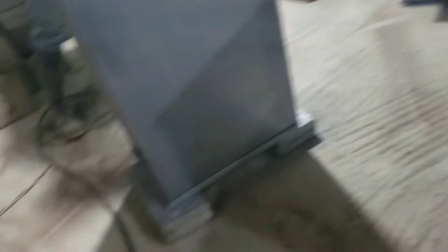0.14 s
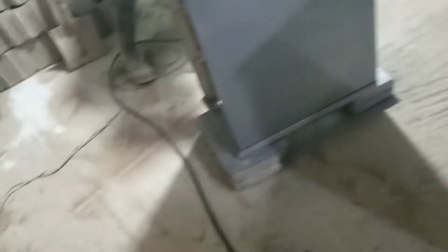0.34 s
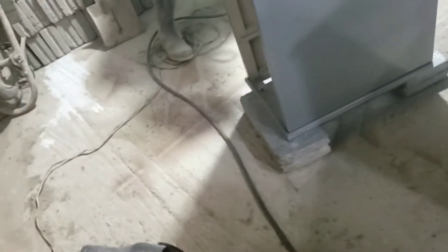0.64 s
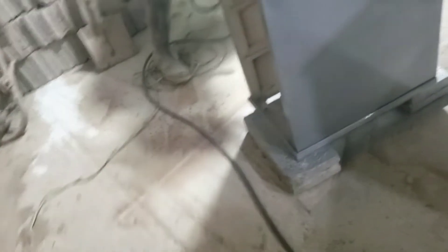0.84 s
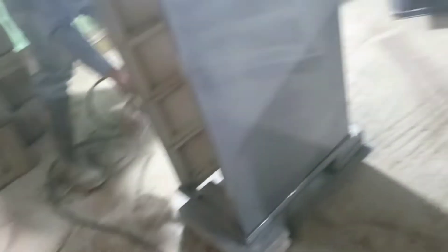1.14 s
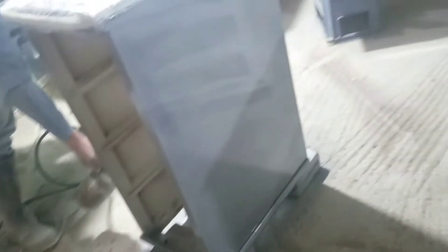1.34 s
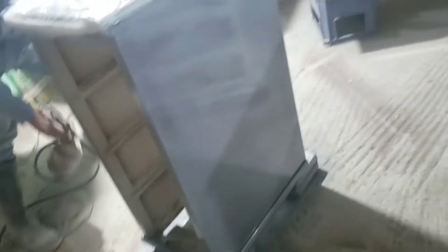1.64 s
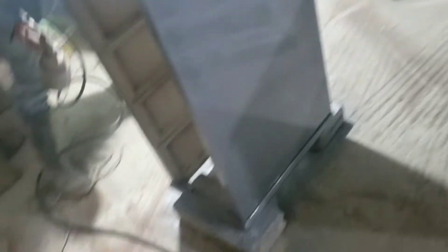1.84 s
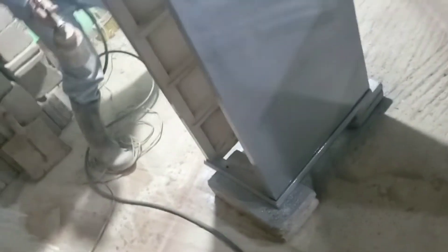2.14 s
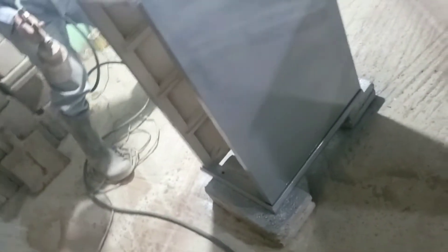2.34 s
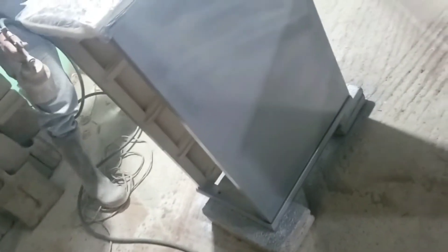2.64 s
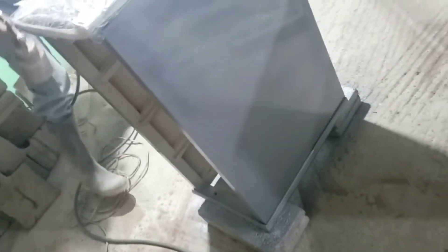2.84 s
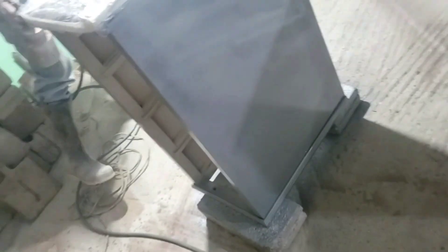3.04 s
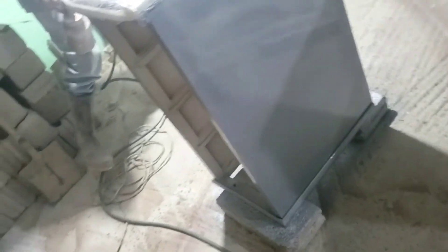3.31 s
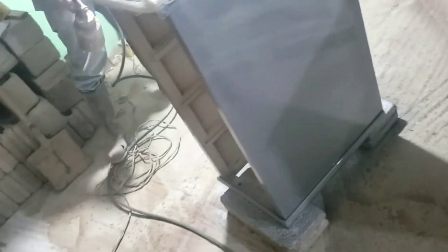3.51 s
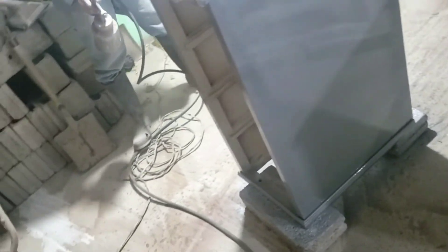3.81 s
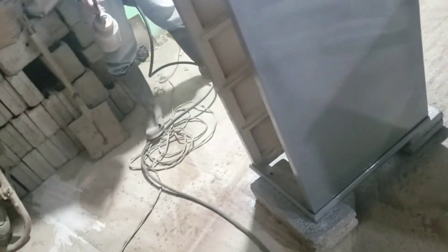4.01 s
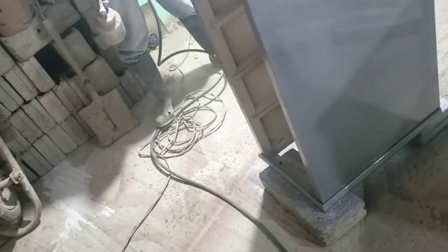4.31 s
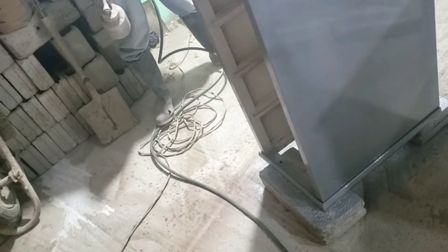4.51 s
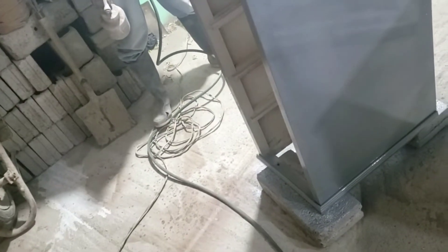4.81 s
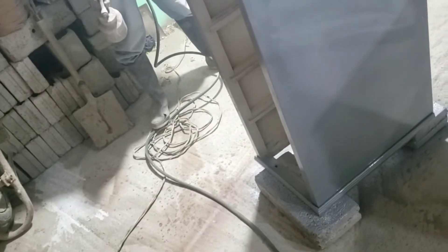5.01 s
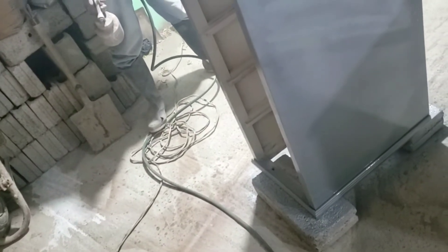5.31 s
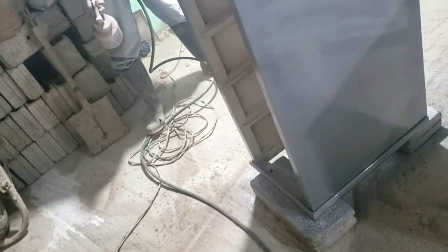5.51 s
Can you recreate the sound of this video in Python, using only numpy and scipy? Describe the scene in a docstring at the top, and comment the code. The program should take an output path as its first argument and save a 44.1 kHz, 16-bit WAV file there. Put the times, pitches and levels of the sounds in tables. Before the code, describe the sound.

A small piston air compressor runs steadily for about 5.7 seconds in a bare concrete room, with no start or stop. About fifty-five strokes a second fuse into a low, buzzing drone, strongest in the low mids around 400 to 550 Hz, with mains hum and pulsing fan roar underneath. A thin whine near 1.9 kHz flutters quickly, flaring early and near 1 second, dipping around 1.6, and returning near 2.9. The casing buzz dulls toward 1 second, then opens brighter by 1.5 to 2.5. The deep throb grows slowly until about 4.2 seconds, then holds. Individual tones swell, fade and drift between left and right as the microphone is carried about. Over everything lies an unsteady rush of air, with rapid valve spitting and fine high hiss well to the left, strongest at first, softer from about 1.8 to 3.8 seconds, then slightly fuller again.

```python
"""Small air compressor in a bare room

A small piston air compressor runs steadily in a bare concrete room while the microphone is carried about.
Each stroke adds a thump, built from tones at multiples of the stroke rate, and a spit of air at a valve.
The motor adds mains hum and a thin whine; filtered noise makes the fan's roar and a hiss on the left.
Tones swell and fade as the microphone passes through the room's standing waves.
"""
import sys
import numpy as np
from scipy.fft import rfft, irfft, next_fast_len
from scipy.io import wavfile
from scipy.ndimage import map_coordinates

SR = 44100
rng = np.random.default_rng(int(sys.argv[2]) if len(sys.argv) > 2 else 0)


def pcm_store(signal):
    """Save signal as 16-bit PCM."""
    levels = np.round(np.clip(np.atleast_2d(signal), -1, 1) * 32767)
    wavfile.write(sys.argv[1], SR, levels.astype(np.int16).T)


N = 249606


def amp(db):
    """Turn decibels into a gain."""
    return 10 ** (np.asarray(db) / 20)


def unit(x):
    """Scale a stereo pair so that the average of its two sides has rms 1."""
    return x / np.sqrt(np.mean(x.mean(0) ** 2) + 1e-20)


def along(points, hz):
    """Read a value from (f/Hz, value) points, joined by lines on a log axis."""
    f, v = np.transpose(points)
    return np.interp(np.log(hz + 1), np.log(f + 1), v)


def curves(rows):
    """Give one value per sample for each column after the time."""
    s, *columns = np.transpose(rows)
    return [np.interp(np.arange(N) / SR, s, column) for column in columns]


def swing(level_db):
    """Keep only how a level moves about its mean."""
    return level_db - level_db.mean()


def wobble(rate):
    """Draw a smooth random curve through `rate` random points a second."""
    knots = rng.standard_normal(int(N * rate / SR) + 4)
    coarse = np.arange(0, N + 64, 64)  # every 64th sample is enough for a slow curve
    return np.interp(np.arange(N), coarse, map_coordinates(knots, [coarse * rate / SR]))


def filtered(x, response):
    """Multiply the spectrum of x by a response that depends on frequency."""
    m = next_fast_len(N + SR // 2)
    return irfft(rfft(x, m) * response(np.fft.rfftfreq(m, 1 / SR)), m)[..., :N]


def pan(left_db):
    """Left and right gains whose mean is 1, from left minus right in dB."""
    ratio = np.atleast_1d(amp(left_db))
    return 2 * np.array([ratio, np.ones_like(ratio)]) / (1 + ratio)


# How alike the two sides of the noise are: (f/Hz, likeness 0-1)
LIKENESS = [(50, 0.38), (300, 0.86), (700, 0.19), (1400, 0), (2500, 0.019)]


def noise(spectrum, balance):
    """Shape stereo noise whose sides are most alike in the bass and unrelated in the treble."""
    def turn(hz):
        return np.arccos(np.clip(along(LIKENESS, hz), -1, 1)) / 2

    def shares(hz):
        return amp(along(spectrum, hz)) * [np.cos(turn(hz)), np.sin(turn(hz))]

    mid, side = filtered(rng.standard_normal((2, N)), shares)
    pair = np.array([mid + side, mid - side])
    return unit(filtered(pair, lambda hz: pan(along(balance, hz))))


# How much earlier a tone reaches the left ear, before a cap at 0.00034 s: (t/s, lead/s)
LEFT_LEAD = [(0, 0.00036), (0.9, 0.00025), (1.3, 0.00017), (2.5, 0.00014), (5.66, 0.00024)]


def tone(phase, hz, left_db, spread=0.67):
    """Play one tone, earlier at the left ear; reflections pull the ears of high tones apart."""
    lead_s = np.clip(curves(LEFT_LEAD)[0], 0, 0.00034)
    direct = np.pi * min(hz, 900) * lead_s
    apart = direct + spread * min(hz / 1000, 1) ** 2 * np.tanh(wobble(0.92))
    left, right = pan(left_db)
    # the phase gap weakens the average of the two sides, so make up for that
    centre = np.hypot(np.cos(apart), (left - right) / 2 * np.sin(apart))
    pair = np.array([left * np.cos(phase + apart), right * np.cos(phase - apart)])
    return np.sqrt(2) * pair / np.maximum(centre, 0.6)


# Where the microphone is, which sets how the reflected sound meets the direct sound: (t/s, place/m)
WALK = [(0.0, 2), (0.35, 0.7), (0.8, 0.75), (1.2, 1), (1.7, 2.6), (2.5, 2), (3.0, 2.5), (3.6, 2),
        (4.3, 2.84), (5.66, 1)]


def standing(share, node_m, spacing_m):
    """Level in dB along the walk: a wall's reflection weakens the direct sound at every node."""
    place = (curves(WALK)[0] - node_m) / spacing_m
    return 20 * np.log10(np.abs(1 - np.clip(share, 0, 0.95) * np.exp(2j * np.pi * place)))


THROB_START_DB, THROB_RISE_DB_PER_S, THROB_HOLD_S = -4, 1.53, 4.2


def throb():
    """Change of the deep throb in dB: a steady rise, then a hold."""
    return THROB_START_DB + THROB_RISE_DB_PER_S * np.minimum(np.arange(N) / SR, THROB_HOLD_S)


# How fast the piston strokes: (t/s, strokes a second)
STROKE_RATE = [(0, 55.34), (0.6, 55.28), (5.66, 55.27)]


def crank():
    """Count the crank's turns, one a stroke; it runs almost evenly."""
    turns = 1.08 + np.cumsum(curves(STROKE_RATE)[0]) / SR
    return turns + 0.001 * wobble(25)


# An "order" is a multiple of the stroke rate.
# Level of each order before its swells and fades: (order, level/dB)
ORDER_LEVELS = [(1, -45.5), (2, -46), (3, -47), (4, -36.5), (5, -35.0), (6, -37.5), (7, -31.5), (8, -30.5),
                (9, -32.7), (10, -29.5), (11, -34), (12, -42), (13, -47.5), (14, -35), (15, -42.5),
                (16, -48.5), (17, -43), (18, -55.5), (19, -41.5), (20, -54), (21, -47.5), (22, -49),
                (23, -44), (24, -53.5), (25, -64), (26, -46.5), (27, -52), (28, -54.5)]
# Each stroke is held back by the tank's ring: (f/Hz, delay/s)
TANK_DELAY = [(250, 0.0015), (310, 0.0011), (360, 0.0041), (415, 0.011), (470, 0.0243), (525, 0.0157),
              (580, .013), (640, 0.005)]
# How low orders follow the throb, or (below 0) oppose it; the last share also serves the orders above,
# and orders with a curve or standing wave of their own ignore it: (order, share of the throb's change)
THROB_SHARE = [(1, 1), (2, -0.83), (3, 0.62), (4, 0.7), (5, 0.13), (6, 0.13), (7, -0.32), (8, 0.62)]
# Level of the casing's buzz, the orders above 12: (t/s, level/dB)
BUZZ_LEVEL = [(0, 3), (1.0, -1.5), (1.6, 4), (2.4, -1.1), (5.66, 1)]
# Tilt of the buzz, which turns dull at first and then opens: (t/s, tilt/dB per octave)
BUZZ_TILT = [(0, 2), (0.9, -12), (1.5, -1.5), (2.6, 1), (4.4, 1), (5.66, 0.5)]
# Left against right: (f/Hz, left minus right/dB)
BALANCE = [(55, 4), (130, 0.5), (220, 1), (330, -0.5), (600, 1.5), (900, 6), (1500, 3), (1900, 4),
           (3000, 6), (4200, -0.5), (5000, 8.5)]
# Orders with a marked standing wave: (order, left minus right/dB, reflected share 0-1, node/m, spacing/m)
STANDING_ORDERS = [(7, -1, 0.18, 1.85, 2.1), (15, 1, 0.7, 0.23, 2.02), (19, 6.5, 0.4, 2.17, 2.1)]
# Orders 8, 9 and 10, the loudest, and 14, the fan's blade tone; only the swing about the mean level counts:
# (t/s, level/dB, left minus right/dB)
EIGHTH_ORDER = [(0.0, -27.5, -4), (0.32, -26.5, 10.5), (0.65, -27, 11), (1.26, -25, 0), (1.63, -30, -1.5),
                (2.74, -38, 20), (3.2, -31.5, 6), (5.19, -31.5, 7), (5.2, -31, 3.5)]
NINTH_ORDER = [(0.0, -54, 3), (0.4, -43, 16), (0.58, -36.5, 16), (1.21, -35, 26), (1.48, -33, 12),
               (1.72, -30, 12), (2.43, -32.5, 2), (5.2, -28.5, 6)]
TENTH_ORDER = [(0.0, -36.5, 20), (0.06, -28.5, 36), (0.33, -26, 8.5), (1.27, -26.5, -1), (1.54, -33, -13),
               (3.17, -28.5, 1.5), (4.36, -32.5, -9), (5.2, -33, -8)]
BLADE_TONE = [(0.0, -36, 4), (0.13, -32, 17), (0.38, -42, 7), (0.81, -44, 17), (1.0, -37, 0),
              (1.25, -32.5, 7), (2.67, -39.5, 6), (5.3, -36, 25)]


def drone(turns, fading_db=2.0, smear=1.32):
    """One pressure pulse a stroke rings the tank; the room makes each order swell and fade."""
    throb_db, buzz_db, tilt_db = throb(), curves(BUZZ_LEVEL)[0], curves(BUZZ_TILT)[0]
    marked = {round(k): (standing(*wave), left_db) for k, left_db, *wave in STANDING_ORDERS}
    for k, table in ((8, EIGHTH_ORDER), (9, NINTH_ORDER), (10, TENTH_ORDER), (14, BLADE_TONE)):
        level_db, left_db = curves(table)
        marked[k] = (swing(level_db), left_db)
    rate = np.mean(curves(STROKE_RATE)[0])
    out, lag = np.zeros((2, N)), 0
    for k, (_, db) in enumerate(ORDER_LEVELS, 1):
        hz = k * rate
        if k <= 12:
            # low orders pass through the tank, whose ring holds them back
            lag += 2 * np.pi * rate * along(TANK_DELAY, hz - rate / 2)
            offset = -lag
            near_db = along(THROB_SHARE, k) * throb_db
        else:
            # high orders come straight from the head as a sharp dip in pressure, smeared by the walls
            offset = np.pi + smear * rng.standard_normal()
            near_db = buzz_db + tilt_db * np.log2(max(hz, 1000) / 1150)
        # short waves have closely spaced nodes, so high orders fade the deepest
        depth_db = fading_db * min(hz / 1100, 1) ** 2
        fading_level_db = near_db + depth_db * wobble(1.544) - depth_db / 4
        fading_left_db = along(BALANCE, hz) + depth_db * wobble(1.5)
        change_db, left_db = marked.get(k, (fading_level_db, fading_left_db))
        gain = amp(db + change_db + 0.17 * wobble(18))
        out += gain * tone(2 * np.pi * k * turns + offset, hz, left_db)
    return out


def rattle(turns, db=-46.5, count=58):
    """The valve plate's faint buzz: higher orders, each with its own level and phase at each ear."""
    out = np.zeros((2, N))
    for k in range(len(ORDER_LEVELS) + 1, count):
        size = amp(5.8 * rng.standard_normal((2, 1)))
        phase = rng.uniform(0, 2 * np.pi, (2, 1))
        out += size * amp(5.5 * wobble(1.42)) * np.cos(2 * np.pi * k * turns + phase)
    return amp(db) * unit(out)


MAINS_HZ = 120


def mains_phase():
    """Phase of the mains field's pull on the motor."""
    return 2 * np.pi * MAINS_HZ * np.arange(N) / SR


def hum(base_db=-52.5):
    """Mains hum, which beats against the drone's second order and sinks as the throb grows."""
    return amp(base_db - 0.4 * throb()) * tone(mains_phase(), MAINS_HZ, 1)


# Level of the whine; only its swing about the mean counts: (t/s, level/dB)
WHINE_LEVEL = [(0.0, -45), (0.07, -36.5), (0.39, -56), (0.48, -43), (0.74, -45), (0.99, -37.5), (1.64, -56),
               (1.73, -48.5), (2.57, -46.5), (2.89, -39), (3.35, -47), (3.5, -43), (5.4, -42)]
# Standing wave of the whine's sideband: (reflected share 0-1, node/m, spacing/m)
SIDEBAND_WAVE = (0.77, 0.26, 1.27)


def whine(turns, mean_db=-45, sideband_db=-54.5, flutter_db=0.5, beat=0.24, whine_hz=1899.5):
    """The motor's thin whine and a sideband one stroke rate lower, both pulsing with the rotor's slip."""
    # the rotor slips behind the mains field, so its pull swells about nine times a second
    slip = 1 + beat * np.cos(mains_phase() - 2 * np.pi * 2 * turns)
    whine_phase = 2 * np.pi * whine_hz * np.arange(N) / SR + 0.06 * wobble(18)
    main_db = mean_db + swing(curves(WHINE_LEVEL)[0])
    lower_db = sideband_db + standing(*SIDEBAND_WAVE)
    out = np.zeros((2, N))
    for below, level_db in enumerate([main_db, lower_db]):
        phase = whine_phase - 2 * np.pi * below * turns
        gain = amp(level_db + flutter_db * wobble(20)) * slip
        out += gain * tone(phase, whine_hz, 8.8, spread=0.33)
    return out


# Faint steady tones, the 2984 Hz one at the 54th order, before the throb and flutter: (f/Hz, level/dB)
FAINT_TONES = [(783.3, -46.5), (1955, -63), (2649, -56), (2984, -51.5), (3677, -54), (4560, -53),
               (5362, -51)]


def faint_tones(flutter_db=0.5):
    """Faint steady-pitched tones of the motor and of the 54th order, which grow with the throb and flutter a
    little."""
    t, throb_db = np.arange(N) / SR, throb()
    out = np.zeros((2, N))
    for hz, db in FAINT_TONES:
        level_db = db + 1.2 * throb_db + 0.43 * wobble(2.1) + flutter_db * wobble(14)
        phase = 2 * np.pi * hz * t + 0.11 * wobble(17)
        out += amp(level_db) * tone(phase, hz, along(BALANCE, hz))
    return out


def puffs(turns, depth, life, scatter_db):
    """A gain that peaks a share (life) into each turn, then dies away; each peak's strength is random."""
    stroke = turns.astype(int)
    size = amp(scatter_db * rng.standard_normal(N // 100))[stroke]
    age = (turns - stroke) / life
    return 1 + depth * size * age * np.exp(1 - age)


# Colour of the fan's roar: (f/Hz, relative level/dB per Hz)
FAN_SPECTRUM = [(25, -18), (55, -1), (90, -6.5), (160, -3.5), (300, -3), (480, 3), (660, -2), (720, -2),
                (785, 6), (900, -2), (1300, -1), (1700, -8.5), (2300, -19), (3500, -49)]


def fan(turns, db=-35.5):
    """The cooling fan's roar: low noise that pulses with each stroke."""
    roar = unit(noise(FAN_SPECTRUM, BALANCE) * puffs(turns, depth=0.35, life=0.15, scatter_db=2))
    return amp(db + 0.25 * wobble(5.15)) * roar


# Colours of the rush, the valve's spit and the hiss: (f/Hz, relative level/dB per Hz)
RUSH_SPECTRUM = [(1000, -29), (1700, -6.5), (1820, -10), (1885, 0.5), (1950, -5), (2060, -8), (2920, -4),
                 (3380, -6), (3590, -3.5), (5200, -7), (6760, -49), (11400, -120)]
VALVE_SPECTRUM = [(2820, -20.5), (4800, -7.5), (5040, -26), (5450, -1), (6210, 3), (6920, -4.5),
                  (8200, -25.5), (10700, -49), (18000, -120)]
HISS_SPECTRUM = [(7000, -35), (8200, -53), (8600, -8), (9200, -10.5), (10300, -3), (12500, 0), (14500, 3.5),
                 (15300, -42)]
# Level of the escaping air: (t/s, level/dB)
JET_LEVEL = [(0.15, 2.5), (0.8, 0.9), (1.25, 2), (1.85, -1.7), (2.6, -1.8), (3.15, -1.1), (3.8, -1.2),
             (4.35, 0.8), (5.5, 0.1)]
# The microphone faces the valve at first, then turns away
VALVE_TURN_DB, VALVE_TURN_S = 2.5, 1


def jet(turns, rush_db=-36.0, valve_db=-36.0, hiss_db=-35.5, flutter_db=1.13):
    """Escaping air: a broad rush, the valve's spitting and a fine fluttering hiss."""
    # left minus right of valve and hiss: (f/Hz, left minus right/dB)
    valve_balance = [(4500, 12), (5400, 23.5), (7500, 16.3)]
    hiss_balance = [(9000, 28.0), (11000, 16), (14000, 25)]
    rush = unit(noise(RUSH_SPECTRUM, BALANCE) * puffs(turns, depth=0.17, life=0.22, scatter_db=3.5))
    spit = puffs(turns, depth=0.81, life=0.051, scatter_db=1.5)
    valve = unit(noise(VALVE_SPECTRUM, valve_balance) * spit)
    hiss_puffs = puffs(turns, depth=0.25, life=0.094, scatter_db=6)
    hiss = unit(noise(HISS_SPECTRUM, hiss_balance) * hiss_puffs)
    jet_db = curves(JET_LEVEL)[0]
    facing_db = VALVE_TURN_DB * np.exp(-(np.arange(N) / SR / VALVE_TURN_S) ** 2)
    out = amp(rush_db + jet_db) * rush
    out += amp(valve_db + jet_db + facing_db + 1.1 * wobble(45)) * valve
    out += amp(hiss_db + jet_db + 1.07 * wobble(35)) * hiss
    return amp(flutter_db * wobble(45)) * out


def scene():
    """Add up all the sources; the crank sets the timing of every stroke."""
    turns = crank()
    motor = hum() + whine(turns) + faint_tones()
    air = fan(turns) + jet(turns)
    return drone(turns) + rattle(turns) + motor + air


TOP_HZ = 14680


def record(dry):
    """The recorder keeps nothing at or above its band limit."""
    return filtered(dry, lambda hz: hz < TOP_HZ)


dry = scene()
out = record(dry)
pcm_store(out)
```